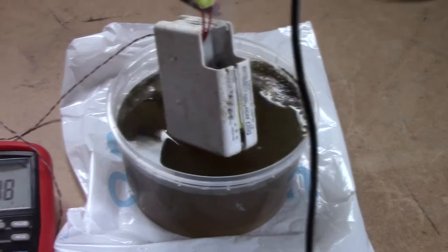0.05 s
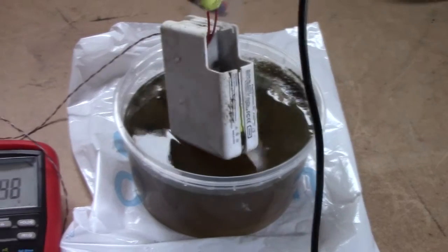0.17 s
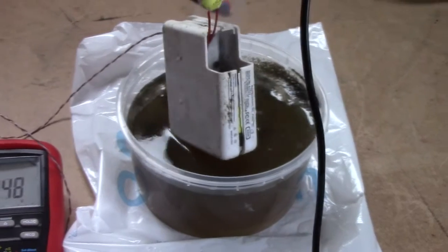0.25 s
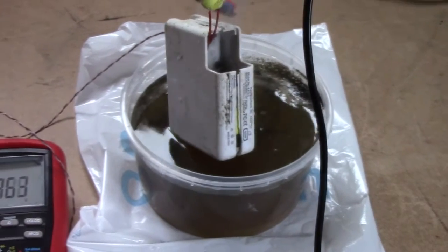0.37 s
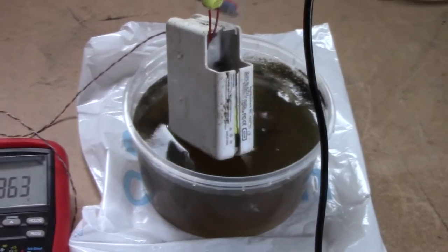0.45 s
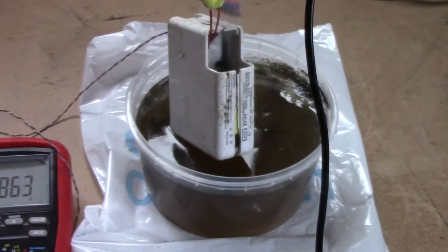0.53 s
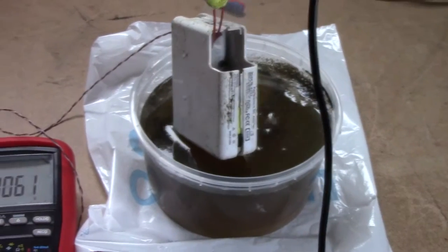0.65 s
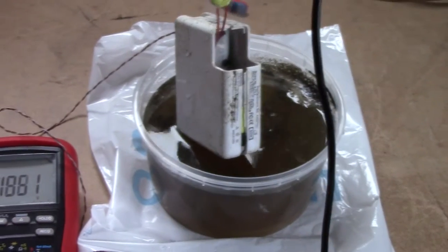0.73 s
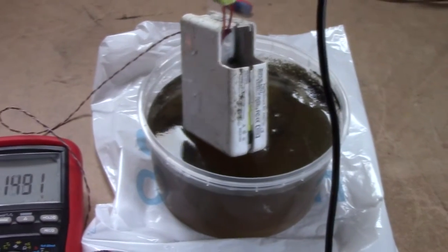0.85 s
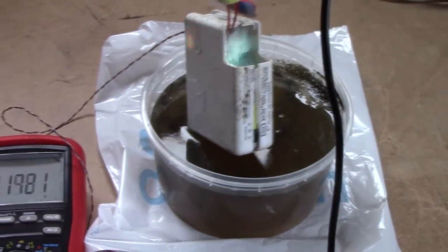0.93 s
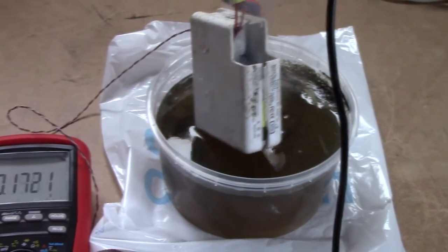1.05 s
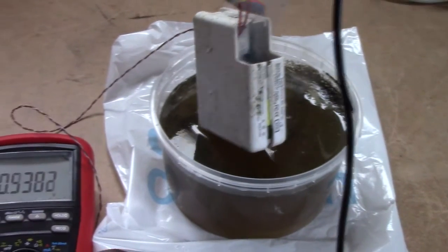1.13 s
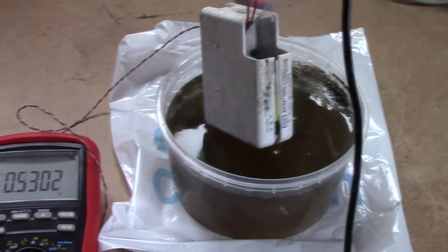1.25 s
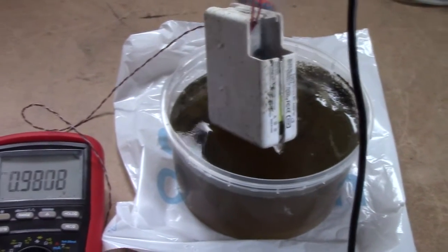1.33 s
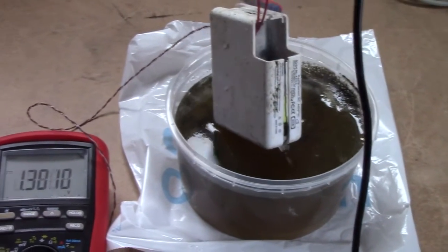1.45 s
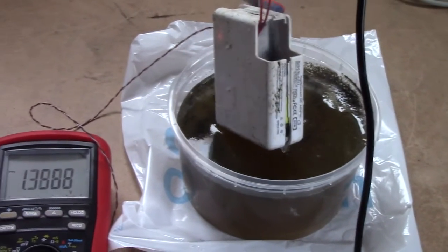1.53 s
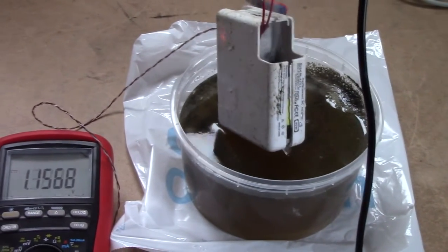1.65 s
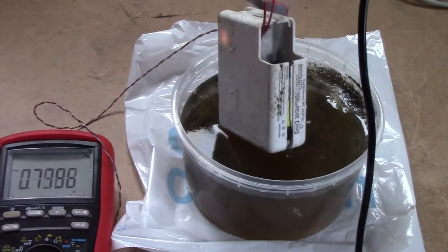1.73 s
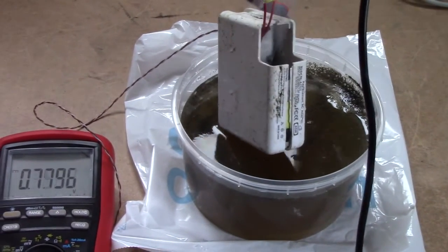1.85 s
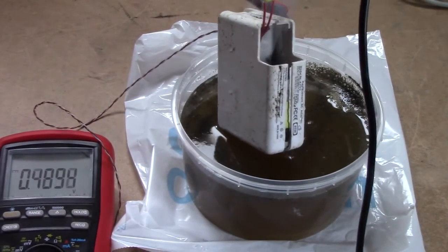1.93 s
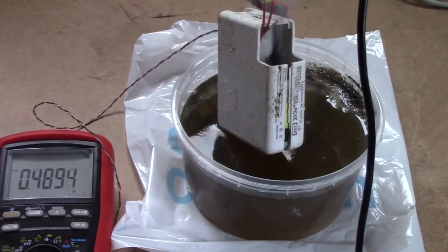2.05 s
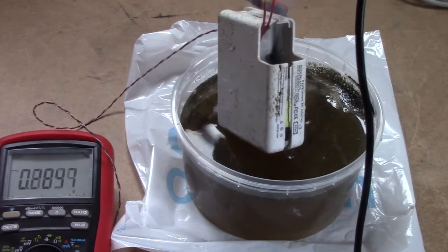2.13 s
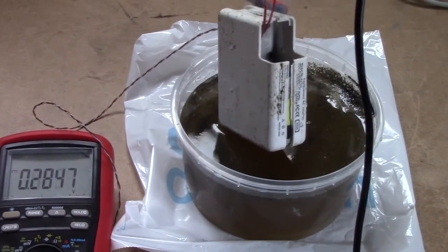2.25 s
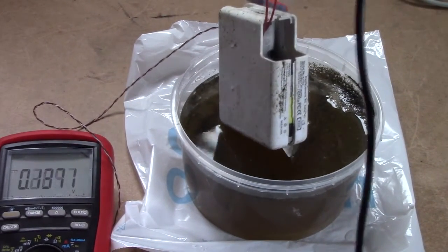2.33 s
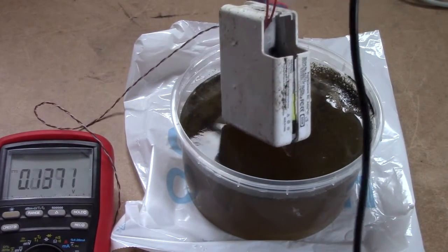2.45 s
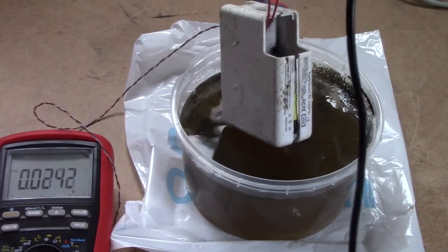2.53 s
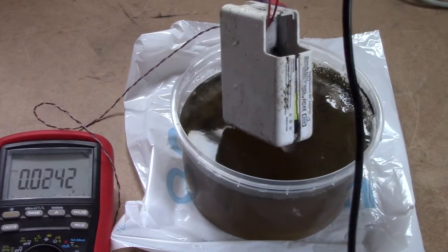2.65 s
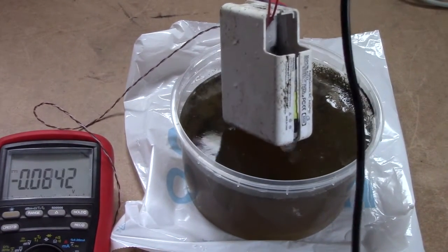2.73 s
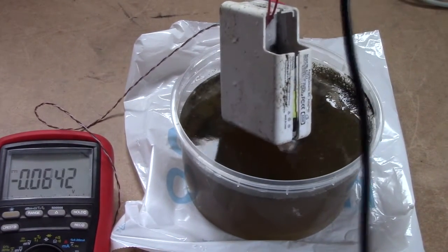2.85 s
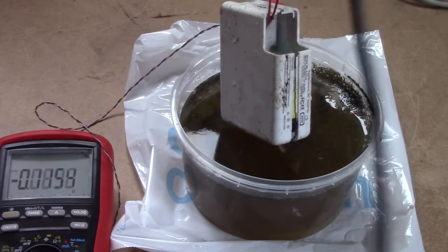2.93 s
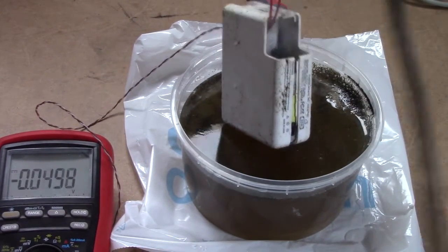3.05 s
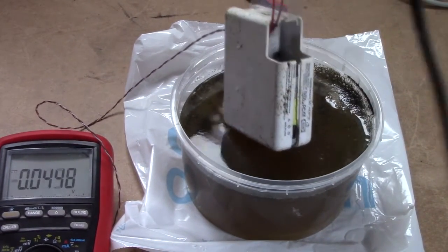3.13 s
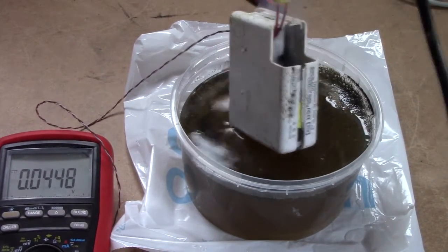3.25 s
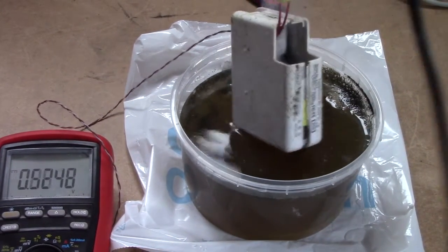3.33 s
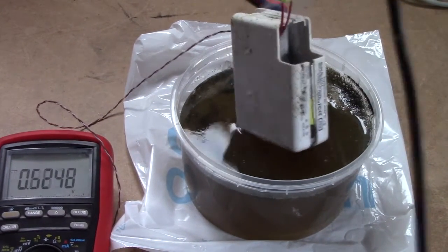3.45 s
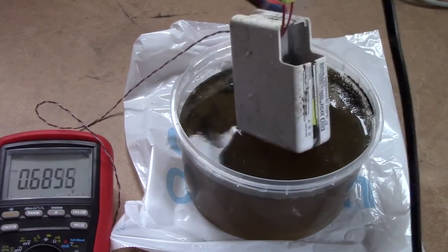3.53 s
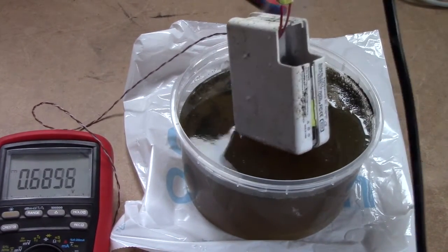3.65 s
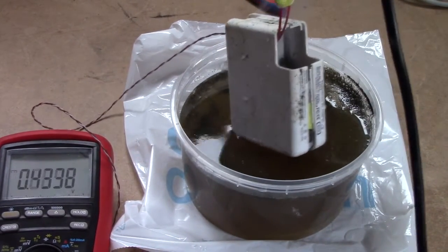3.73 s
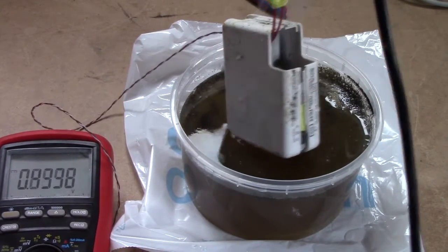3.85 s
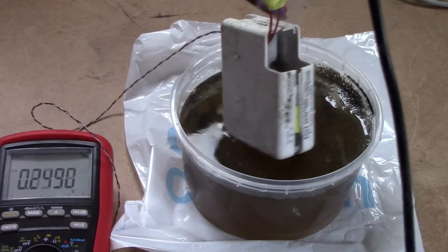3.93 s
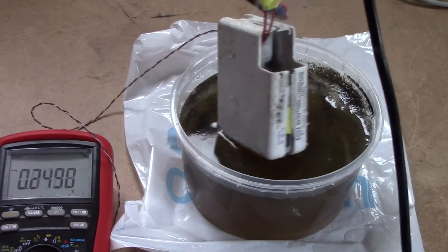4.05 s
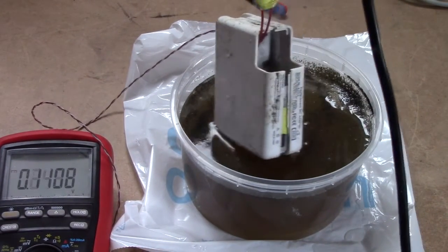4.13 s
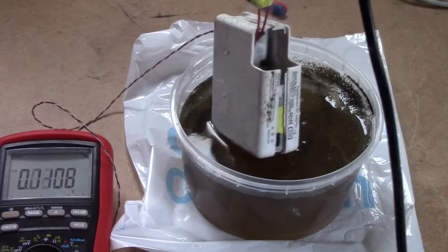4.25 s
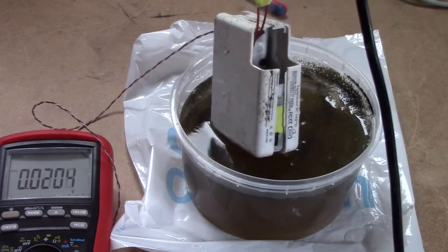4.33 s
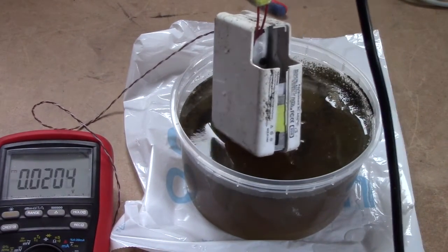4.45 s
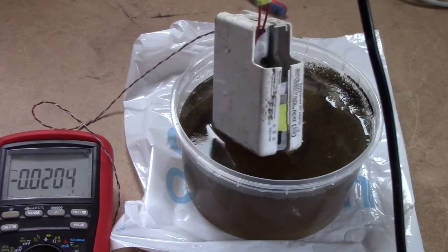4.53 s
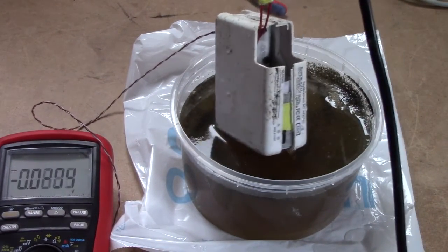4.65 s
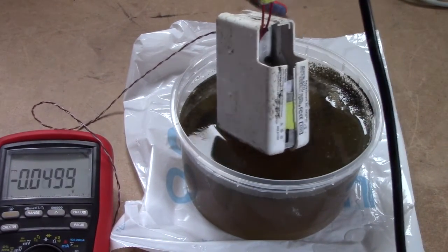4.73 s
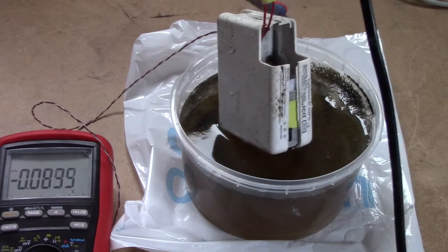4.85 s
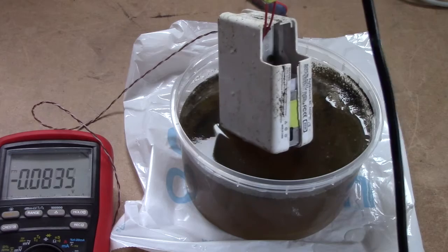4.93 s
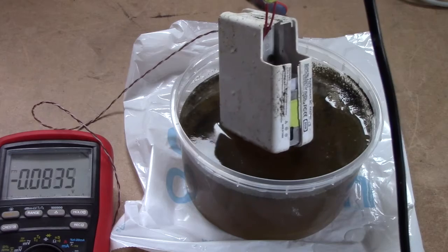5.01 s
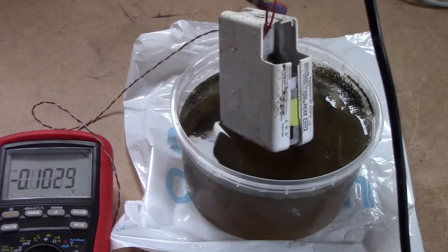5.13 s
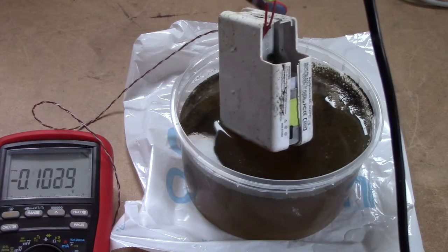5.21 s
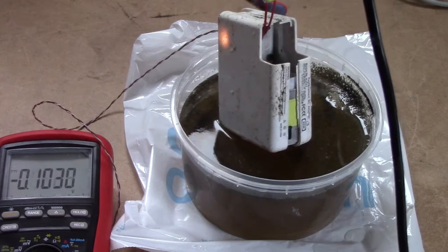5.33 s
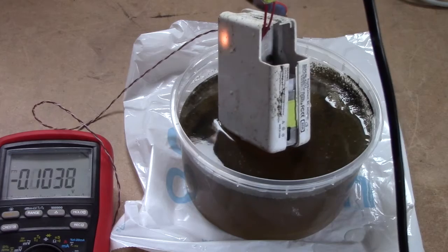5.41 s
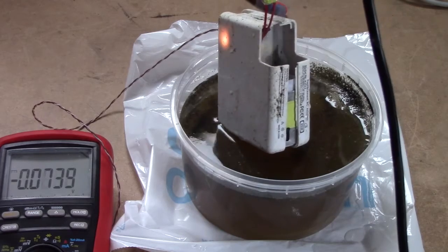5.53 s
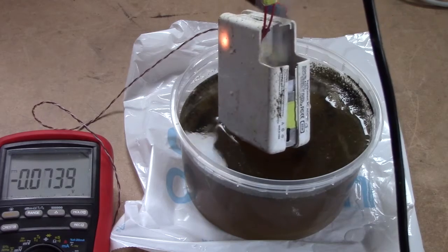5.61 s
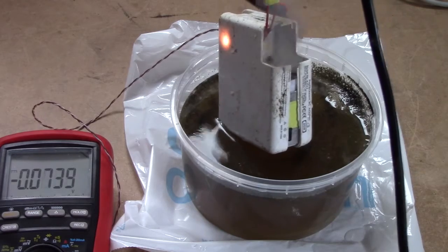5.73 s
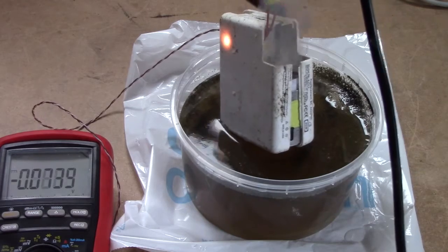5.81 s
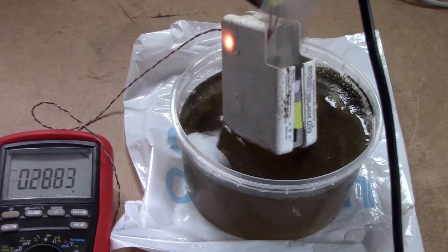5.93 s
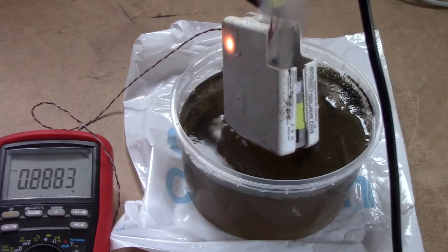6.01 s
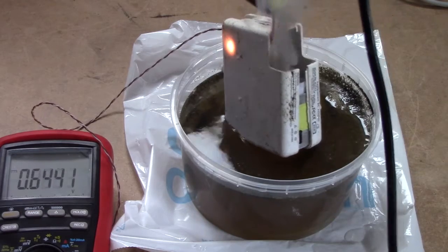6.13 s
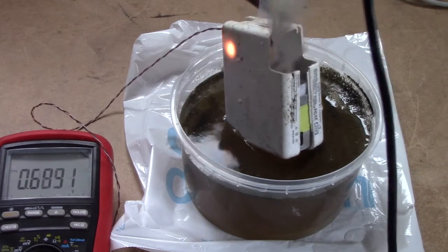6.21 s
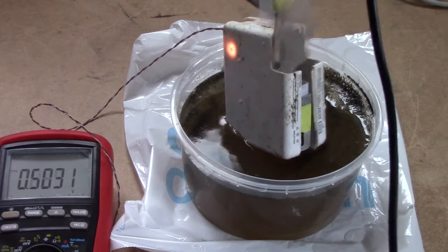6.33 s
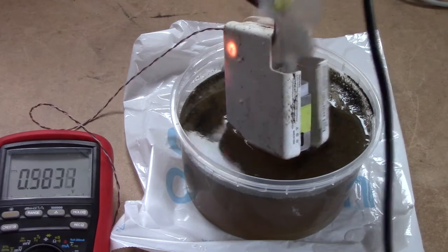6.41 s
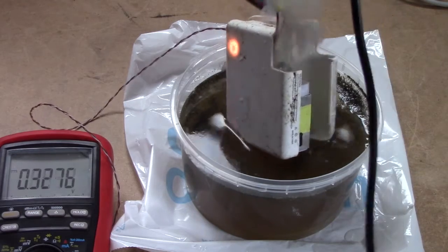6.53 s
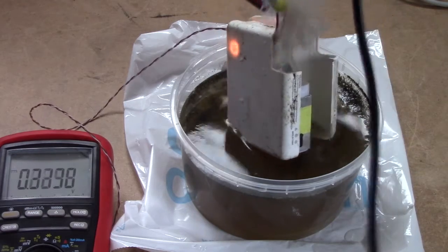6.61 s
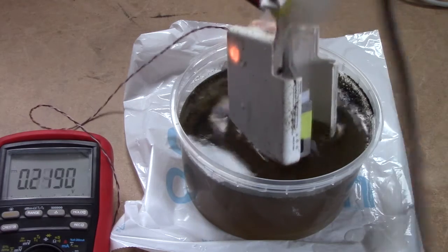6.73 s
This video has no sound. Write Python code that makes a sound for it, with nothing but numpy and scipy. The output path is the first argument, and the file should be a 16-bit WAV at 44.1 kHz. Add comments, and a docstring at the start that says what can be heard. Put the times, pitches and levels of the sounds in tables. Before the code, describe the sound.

Isolated violent spark pops with short hollow ringing, small bubble ticks and sizzle between them, finally a harsh uneven crackling buzz breaking into single snaps.

```python
"""Sparking charger in salt water

A live mains charger hangs in a tub of salt water on a workbench in a small quiet room.
Sparks crack inside its plastic casing and overload the microphone: clicks set off ringing and an echo of noise.
Between them the brine fizzes and ticks (grains and puffs of noise), and the casing bumps the tub (ringing tones).
At the end the arc strikes over and over, as an uneven buzz that breaks up into single cracks."""
import sys
import numpy as np
from scipy import signal
from scipy.io import wavfile
from scipy.ndimage import uniform_filter1d

SR = 44100
rng = np.random.default_rng(int(sys.argv[2]) if len(sys.argv) > 2 else 0)


def log_audio(samples):
    """Write samples as a 16-bit WAV file to the path given in sys.argv[1]."""
    # one column per channel
    frames = np.atleast_2d(samples).T
    # limit to full scale, then quantise
    limited = np.clip(frames, -1, 1)
    pcm = np.round(limited * 32767).astype(np.int16)
    wavfile.write(sys.argv[1], SR, pcm)


N = 298557  # length in samples


def from_db(db):
    """Turn decibels into gain."""
    return 10 ** (np.asarray(db) / 20)


def rms_one(x):
    """Scale to an average strength (rms) of 1."""
    return x / np.sqrt(np.mean(x ** 2) + 1e-20)


def in_time(rows):
    """Turn table columns into curves, with one value a sample."""
    s, *columns = np.transpose(rows)
    return [np.interp(np.arange(N) / SR, s, column) for column in columns]


def at_hz(points, hz):
    """Read a spectrum between its points, with pitch on a log scale."""
    point_hz, values = np.transpose(points)
    return np.interp(np.log(hz), np.log(point_hz), values)


def filtered(x, order, edge, kind):
    """Keep one part of the spectrum with a smooth filter."""
    return signal.sosfilt(signal.butter(order, edge, kind, fs=SR, output="sos"), x)


def resonate(x, hz, width_hz):
    """Ring at one pitch (two-pole resonance, gain 1 on top); a narrower width rings longer."""
    r = np.exp(-np.pi * width_hz / SR)
    feedback = [1, -2 * r * np.cos(2 * np.pi * hz / SR), r * r]
    return signal.lfilter([(1 - r * r) / 2, 0, (r * r - 1) / 2], feedback, x)


def bands(length):
    """Give third-octave bands of mid and side noise; neighbours are unrelated."""
    edges = 25 * 2 ** np.arange(0, 9.5, 1 / 3)
    white = rng.standard_normal((2, 2, length))
    for k, (low, high) in enumerate(zip(edges, edges[1:])):
        yield np.sqrt(low * high), filtered(white[k % 2], 2, [low, high], "band")


def clicks(times, gains):
    """Make a train of clicks, each one sample long."""
    train = np.zeros(N)
    places = np.minimum(np.round(np.asarray(times) * SR).astype(int), N - 1)
    np.add.at(train, places, gains)
    return train


def grains(per_s, spread_db):
    """Scatter tiny clicks at random moments, of very uneven size; rms 1."""
    sizes = from_db(spread_db * np.minimum(rng.exponential(1, N), 5)) * rng.choice([-1, 1], N)
    return rms_one(sizes * (rng.random(N) < per_s / SR))


def swell(start, length, rise_db_per_s, fall_db_per_s):
    """Gain that climbs to 1 at the start, holds and dies away."""
    t = np.arange(N) / SR
    before = np.minimum(t - start, 0)
    after = np.maximum(t - start - length, 0)
    return from_db(rise_db_per_s * before - fall_db_per_s * after)


# colour of the room's hiss and rumble: f/Hz, relative level per Hz/dB
ROOM_COLOUR = [(18, -59.5), (30, -19.5), (345, -3.5), (540, -8.5), (1280, -11.5), (1430, -12),
               (1860, -20.5), (2120, -20), (3670, -20), (5450, -24), (5900, -25), (9220, -23.5),
               (14000, -33), (16000, -41.5)]
# how much of it differs between left and right: f/Hz, side against mid level/dB
ROOM_WIDTH = [(60, -12.5), (700, -9.5), (2400, -5.5), (4400, -16), (8100, -32.5), (15000, -38)]
# faint wavering tones in the room: f/Hz, width/Hz, level/dB
ROOM_WHINES = [(338.6, 12, -63), (2060, 14, -73.5), (4100, 49, -77)]
ROOM_LEVEL_DB = -55  # hiss and rumble, rms of mid


def room_tone():
    """Smooth wide hiss and rumble; noise through narrow resonances adds wavering tones; mid and side."""
    hiss = np.zeros((2, N))
    for hz, noise in bands(N):
        mid_db = at_hz(ROOM_COLOUR, hz)
        band_db = np.array([[mid_db], [mid_db + at_hz(ROOM_WIDTH, hz)]])
        hiss += from_db(band_db) * noise
    room = from_db(ROOM_LEVEL_DB) * hiss / np.std(hiss[0])
    white = rng.standard_normal(N)
    room[0] += sum(from_db(db) * rms_one(resonate(white, hz, width)) for hz, width, db in ROOM_WHINES)
    return room


THIN_HZ, THIN_DB = 5561, -71
THIN_BURSTS_PER_S, THIN_EDGE_S = 11.04, .062  # one of the bursts begins at the edge time


def thin_tone():
    """A faint high whine of switching electronics, on for 45 to 100% of each turn."""
    t = np.arange(N) / SR
    turn = (t - THIN_EDGE_S) * THIN_BURSTS_PER_S + 1
    on_share = rng.choice([.45, .6, .7, 1.], 100)[turn.astype(int)]
    gate = uniform_filter1d((turn % 1 < on_share) * 1., size=200)  # soft edges
    return from_db(THIN_DB) * gate * np.sin(2 * np.pi * THIN_HZ * t)


# touches of the casing against the plastic tub: t/s, level before the tub's own levels/dB
TOUCHES = [(.453, -41), (.462, -34.5), (.473, -38)]
# tones at which the tub rings: f/Hz, level/dB, time to fall by 60 dB/s
TUB_TONES = [(696, -1, 0.143), (789, -4, .12), (1276, -4, 0.053), (6340, -4, .03)]


def bumps():
    """Each touch sets the tub's tones ringing and dying away."""
    t = np.arange(SR // 4) / SR
    at, db = np.transpose(TOUCHES)
    ring = sum(from_db(level_db - 60 * t / t60) * np.sin(2 * np.pi * hz * t) for hz, level_db, t60 in TUB_TONES)
    return signal.fftconvolve(clicks(at, from_db(db)), ring)[:N]


# bubbles bursting and drips: t/s, peak level/dB, f/Hz, broad part against pitched part level/dB
BUBBLES_AND_DRIPS = [(0.545, -34, 2150, -4), (1.69, -45, 1037, 0), (1.728, -32, 2200, -20),
                     (2.088, -37.5, 2300, -2), (2.261, -47, 2160, -11), (2.504, -37.5, 2180, -11),
                     (2.583, -45, 2280, -8), (2.79, -39.5, 1040, -3), (2.934, -23.5, 1060, -4),
                     (3.522, -42.5, 673, 3), (3.704, -44, 2210, -12), (3.8, -30.5, 1710, -14),
                     (4.038, -46.5, 966, 2), (4.276, -41, 780, 4), (4.346, -30, 3000, -1),
                     (4.381, -41, 2150, -16), (4.703, -34.5, 2400, -8), (4.942, -36.5, 2150, -20),
                     (5.131, -38, 1340, 4.5), (5.221, -31, 2090, -3)]
PUFF_T60_S = .015  # time for the puff of noise to fall by 60 dB


def ticks():
    """Each one is a puff of noise, part in its own resonance (low ones ring longer) and part broad."""
    out, t = np.zeros(N + SR), np.arange(SR // 5) / SR
    for s, peak_db, hz, broad_db in BUBBLES_AND_DRIPS:
        puff = rng.standard_normal(len(t)) * from_db(-60 * t / PUFF_T60_S)
        pitched = rms_one(resonate(puff, hz, hz * hz / 11000))
        broad = rms_one(filtered(puff, 2, [2200, 8000], "band"))
        sound = pitched + from_db(broad_db) * broad
        out[round(s * SR):][:len(t)] += from_db(peak_db) * sound / np.max(np.abs(sound))
    return out[:N]


# steady strength of both hissing sounds, before their filters: t/s, sizzle level/dB, fizz level/dB
STEADY_LEVELS = [(0, -49.5, -56.5), (.45, -45.5, -54), (.92, -52, -57), (1.2, -60, -67.5),
                 (1.5, -57.5, -61), (1.7, -46.5, -55), (1.9, -58.5, -62), (2.9, -56.5, -61),
                 (3.33, -56, -59.5), (3.4, -62.5, -70), (5.1, -66, -70.5), (5.16, -65, -62)]
# short swells of sizzle and fizz: top t/s, sizzle level/dB, fizz level/dB
SHORT_SWELLS = [(.952, -37, -57), (1.67, -40, -72), (1.73, -42, -76), (2.94, -61, -46), (2.975, -55, -48),
                (5.14, -50, -65), (5.219, -50, -56), (5.297, -38, -56)]
SWELL_RISE_DB_PER_S, SWELL_FALL_DB_PER_S = 500.5, 348.5


def sizzle_and_fizz_gains():
    """Tiny discharges (sizzle) and gas (fizz) run steadily and swell briefly; one gain curve for each."""
    gains = from_db(in_time(STEADY_LEVELS))
    for s, *db in SHORT_SWELLS:
        gains = gains + np.outer(from_db(db), swell(s, 0, SWELL_RISE_DB_PER_S, SWELL_FALL_DB_PER_S))
    return gains


def gas_fizz(gain):
    """Fine gas bubbles burst at the surface: grains through two wide resonances give a bright fizz."""
    fizz = grains(5000, spread_db=3.0)
    return gain * rms_one(resonate(fizz, 9300, 2700) + .5 * resonate(fizz, 5000, 2500))


# noise of the echo at its start: f/Hz, relative level per Hz/dB
ECHO_COLOUR = [(60, -4), (150, 13.5), (300, 11), (450, -0.5), (800, 0), (1400, 5.5), (2200, 5.5),
               (3200, -7), (4500, 3), (7000, -1.5), (10000, -3.5), (15500, 1.5)]
# how fast the echo dies: f/Hz, time to fall by 60 dB/s
ECHO_DECAY = [(200, 0.36), (1000, 0.2), (3000, 0.19), (7000, 0.19), (11000, 0.1), (15500, 0.045)]
# air in tub and casing that rings on under the echo: f/Hz, width/Hz, relative level/dB
HOLLOW_AIR = [(772, 65, 10.5), (813, 8.3, 0), (1027, 50, 6.5), (1434, 57, 6), (1480, 39, -19),
              (1708, 37, 9), (2177, 18, -3), (2110, 91, -17.5), (2704, 45, -23.5), (3240, 59, -21.5),
              (5705, 30, -10)]
HOLLOW_DB = -7.5  # hollow ringing against the echo noise in mid
ECHO_RISE_S, HOLLOW_T60_S = .003, .047
# side: overall level, share of its long waves, and where short waves begin
ECHO_SIDE_DB, SIDE_BASS_DB, SIDE_FROM_HZ = -17, -17, 2300


def echo_tail():
    """What follows any click: noise swells and dies band by band, with hollow ringing in it; mid and side."""
    t = np.arange(SR // 2) / SR
    noise_tail = np.zeros((2, len(t)))
    for hz, noise in bands(len(t)):
        noise_tail += from_db(at_hz(ECHO_COLOUR, hz) - 60 * t / at_hz(ECHO_DECAY, hz)) * noise
    noise_tail = noise_tail * (1 - np.exp(-t / ECHO_RISE_S))
    dying_noise = rng.standard_normal(len(t)) * from_db(-60 * t / HOLLOW_T60_S)
    hollow = sum(from_db(db) * rms_one(resonate(dying_noise, hz, width)) for hz, width, db in HOLLOW_AIR)
    mid = rms_one(noise_tail[0]) + from_db(HOLLOW_DB) * rms_one(hollow)
    # the two microphone ports lie close together: mainly short waves differ between them
    side_noise = rms_one(noise_tail[1])
    side = filtered(side_noise, 3, SIDE_FROM_HZ, "high") + from_db(SIDE_BASS_DB) * side_noise
    return np.array([mid, from_db(ECHO_SIDE_DB) * side]) / np.sqrt(len(t))


# share of each casing voice sent into the echo: level/dB for lid shut, ajar, open, then wet
# the wider the lid opens, the less is left to ring on inside
VOICE_SEND_DB = [-0.5, -1.5, -2, -0.5]
BRINE_SEND_DB, ECHO_DB = -13, -5.5  # share of ticks, bumps and fizz; then the echo as a whole


def with_echo(voices, brine):
    """The direct sound plus its echo; a trace of its slope differs between left and right; mid and side."""
    direct = voices.sum(axis=0) + brine
    sent = from_db(VOICE_SEND_DB) @ voices + from_db(BRINE_SEND_DB) * brine
    tail = signal.fftconvolve(sent[None], from_db(ECHO_DB) * echo_tail(), axes=1)[:, :N]
    return tail + [direct, 0.022 * np.gradient(direct)]


# steam and gas driven out around the wet flashes: start t/s, length/s, level before the casing rings/dB
GAS_RUSHES = [(.99, 0.074, -34), (2.946, 0.015, -50.5), (3.002, 0.05, -35)]
VENT_RISE_DB_PER_S, VENT_FALL_DB_PER_S = 698, 1195.5
VENT_DULL_HZ = 2500  # the gas rushes out duller than a spark cracks


def venting_gas():
    """Steam and gas rush out as dense grains with their treble softened."""
    gain = sum(from_db(db) * swell(s, length, VENT_RISE_DB_PER_S, VENT_FALL_DB_PER_S)
               for s, length, db in GAS_RUSHES)
    dull = signal.butter(1, VENT_DULL_HZ, fs=SR)
    return gain * rms_one(signal.lfilter(*dull, grains(6000, spread_db=3.0)))


def casing_sizzle(gain):
    """Tiny discharges in the casing: grains with softened treble, 15 dB below the given gain."""
    return from_db(-15.0) * gain * signal.lfilter([.4], [1, -.6], grains(3000, spread_db=3.0))


# pace and strength of the arc while it strikes: t/s, sparks per s, middle peak level/dB
ARC_PACE = [(5.5, 104, -1), (5.6, 169, -2.5), (5.701, 214, -5), (5.85, 212, -4), (5.999, 202, -6),
            (6.06, 140, -5), (6.2, 130, -2.5), (6.379, 155, -5), (6.448, 124, -4.5), (6.6, 101, -1.5),
            (6.719, 79, -3)]
# spells in which the arc keeps striking: first spark t/s, last spark t/s
ARC_SPELLS = [(5.3996, 5.4078), (5.4595, 5.5509), (5.5697, 6.1635), (6.1776, 6.255), (6.2736, 6.3642),
              (6.378, 6.3936), (6.4196, 6.4273), (6.4459, 6.4634), (6.5468, 6.5535), (6.5729, 6.6446),
              (6.6953, 6.7346), (6.7595, 6.7684)]
WAIT_SPREAD, RESTED_WAIT = .21, 1.46  # unevenness of waits; the pause before a spell counts as this many


def arc_sparks():
    """The gap recharges and fires again: uneven waits, and a longer wait gives a stronger spark."""
    s, per_s, peak_db = np.transpose(ARC_PACE)
    rows = []
    for first, last in ARC_SPELLS:
        chance = rng.standard_normal((2, 200))
        fine = np.linspace(first, last, num=500)
        fired = np.cumsum(np.interp(fine, s, per_s)) * (fine[1] - first)  # running count of sparks
        waits = np.exp(WAIT_SPREAD * chance[0, :max(round(fired[-1]), 1)])
        counts = np.append(0, np.cumsum(waits)) / waits.sum() * fired[-1]
        at = np.interp(counts, fired, fine)
        strength_db = 6.0 * (np.append(RESTED_WAIT, waits) - 1) + 1.5 * chance[1, :len(at)]
        rows.append(np.transpose([at, np.interp(at, s, peak_db) + strength_db, 0 * at]))  # none of them wet
    return np.vstack(rows)


# quick ringing of the casing: f/Hz, width/Hz, then relative level/dB for lid shut, ajar, open,
# and for a flash over wet parts
CASING_RINGS = [(972, 1074, -5, -5, -5, 0.5), (1630, 790, -15, -9, -9.5, -9.5),
                (2135, 622, -2.5, -2, -4, 2), (3116, 607, -3.5, -0.5, 3.5, -3),
                (3930, 810, -16.5, -20, -21, -0.5), (5254, 2300, -19, -16, -11.5, -12.5),
                (6300, 320, -9.5, -11.5, -10, -12), (6800, 690, -14, -12, -9, -13.5),
                (8524, 1100, -18, -23, -18.5, -9), (9475, 470, -15, -7, -10.5, -8),
                (10550, 690, -9.5, -20, -19.5, -11.5), (11500, 910, -20.5, -17, -25, -24.5),
                (12330, 540, -25.5, -21.5, -37, -19.5), (12370, 1000, -23, -18.5, -43, -14.5),
                (13670, 3200, -25.5, -27.5, -24.5, -26.5), (14980, 660, -33, -32, -39, -25.5)]


def crack(levels_db):
    """The direct sound of one spark: each resonance twice over, so that it swells before it dies; height 1."""
    click = np.eye(1, 1024)[0]
    sound = np.zeros(len(click))
    for k, ((hz, width, *_), db) in enumerate(zip(CASING_RINGS, levels_db)):
        ring = resonate(resonate(click, hz, width), hz, width)
        sound += from_db(db) * (-1) ** k * ring  # neighbours have opposite sign
    return sound / np.max(np.abs(sound))


# single sparks: t/s, peak level/dB, share that flashes over wet parts (0-1)
SINGLE_SPARKS = [(0.9587, 11.5, 1), (0.9692, -2.5, 0.7), (0.9774, 2.5, 0.9), (0.994, 4, 0.8),
                 (1.7835, 12, 0.02), (2.9823, 12.5, 0.79), (2.9944, -9.5, 0.86), (5.3081, 12.5, 0),
                 (5.3912, 8.5, 0), (5.4388, 1.5, 0), (5.6859, 2, 1), (6.5164, -2.5, 0.27), (6.677, 0, 0)]
# the gas pushes the lid open: t/s, opening (0 shut, 1 ajar, 2 open; beyond 2 the dry sparks weaken)
LID_OPENING = [(5.5, 0.026), (5.8, 0.12), (6.05, 0.62), (6.3, 0.86), (6.42, 1.4), (6.56, 2.25)]


def charger(sizzle_gain):
    """Sparks, sizzle and gas ring in the casing, the dry sparks coloured by the lid; shut, ajar, open and wet."""
    at, peak_db, wet = np.vstack([SINGLE_SPARKS, arc_sparks()]).T
    wet = np.clip(wet, 0, 1)
    lid, = in_time(LID_OPENING)
    dry_sparks = clicks(at, from_db(peak_db) * (1 - wet))
    wet_sparks = clicks(at, from_db(peak_db) * wet)
    trains = [dry_sparks * np.clip(1 - abs(lid - state), 0, 1) for state in range(3)]
    trains.append(wet_sparks + venting_gas())
    trains[0] += casing_sizzle(sizzle_gain)
    colours = np.transpose(CASING_RINGS)[2:]
    return np.array([signal.fftconvolve(train, crack(db))[:N] for train, db in zip(trains, colours)])


def scene():
    """Add up all sources, from mid and side to left and right."""
    sizzle_gain, fizz_gain = sizzle_and_fizz_gains()
    brine = ticks() + bumps() + gas_fizz(fizz_gain)
    mid, side = room_tone() + with_echo(charger(sizzle_gain), brine)
    mid = mid + thin_tone()
    return np.array([mid + side, mid - side])


LOPSIDED = 0.035  # square-law part of the microphone stage
CUTOFF_HZ = 15800  # nearly nothing is left above this


def record(dry):
    """The microphone cuts the loudest cracks flat, bends them a little and loses rumble and top."""
    dry = filtered(dry, 2, 70, "high")
    flat = np.clip(dry, -.95, .95)
    flat = flat - LOPSIDED * flat ** 2  # a lopsided stage turns each crack into a faint low thump
    top_cut = signal.ellip(10, .5, 60, CUTOFF_HZ, fs=SR, output="sos")
    return np.clip(signal.sosfilt(top_cut, flat), -1, 1)


dry = scene()
out = record(dry)
log_audio(out)
```